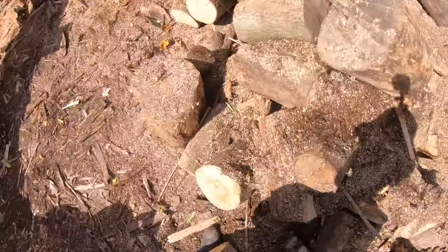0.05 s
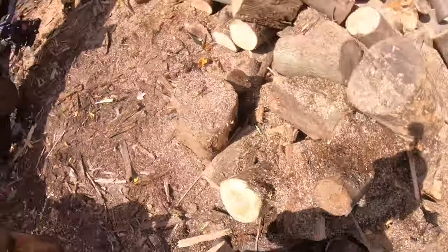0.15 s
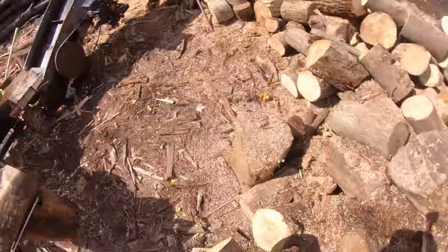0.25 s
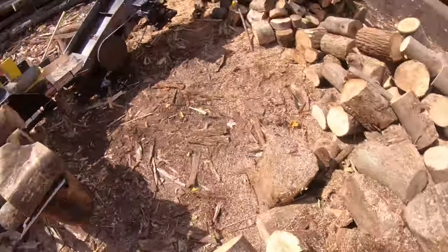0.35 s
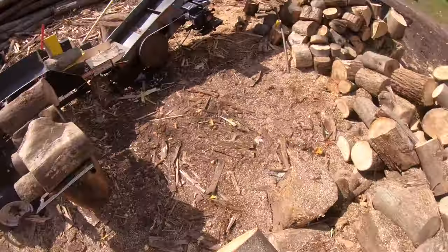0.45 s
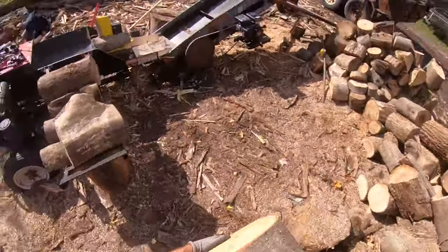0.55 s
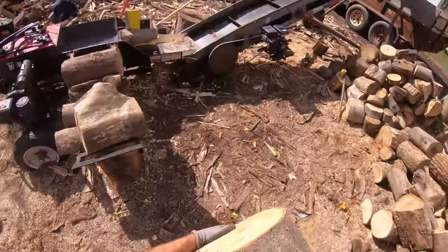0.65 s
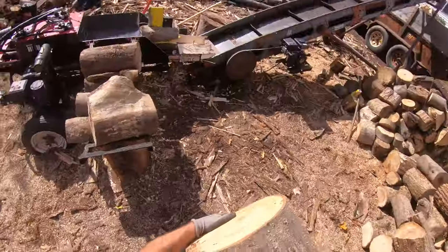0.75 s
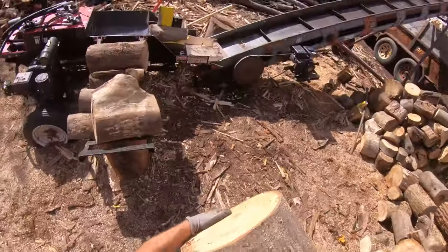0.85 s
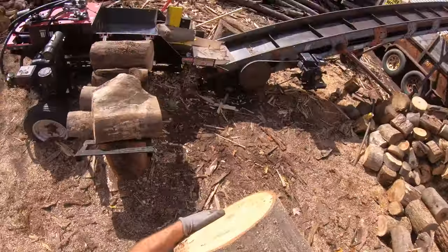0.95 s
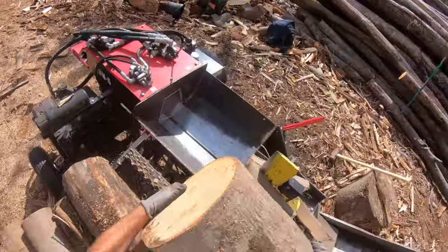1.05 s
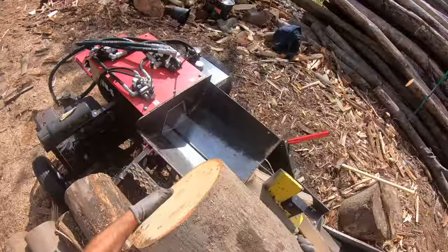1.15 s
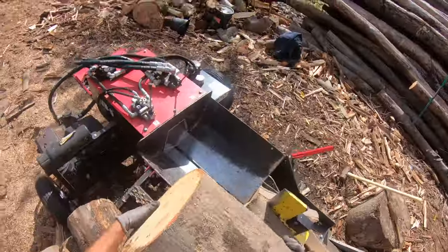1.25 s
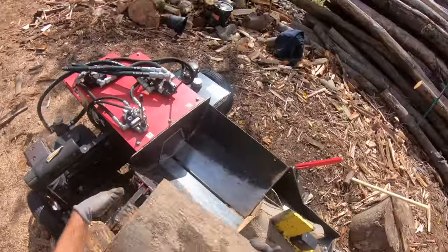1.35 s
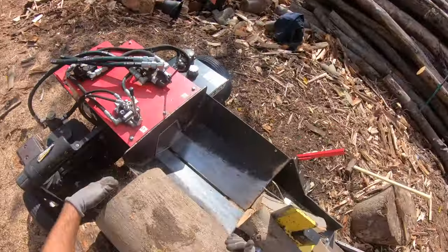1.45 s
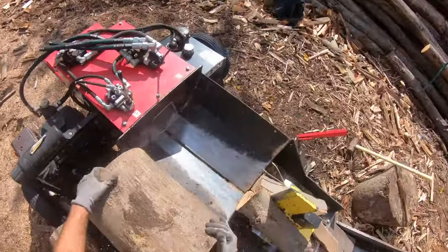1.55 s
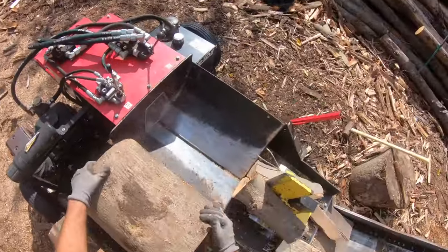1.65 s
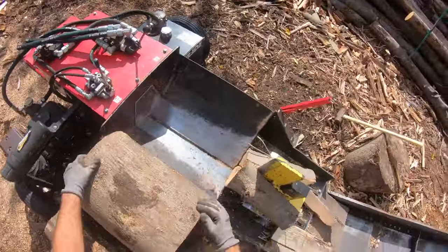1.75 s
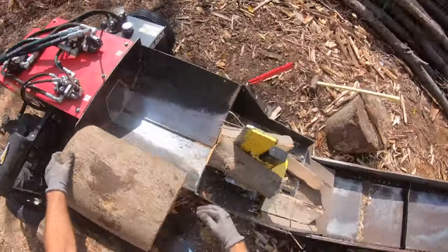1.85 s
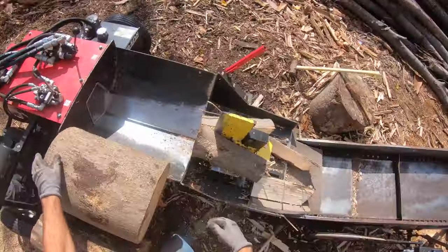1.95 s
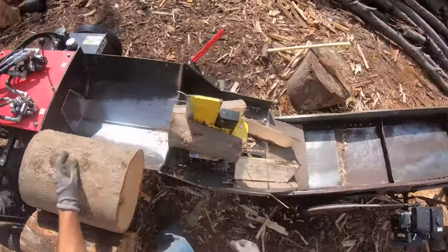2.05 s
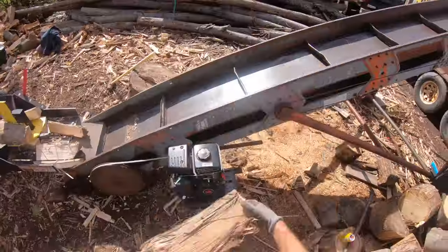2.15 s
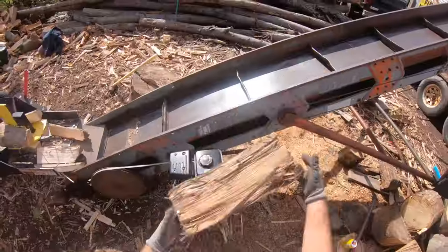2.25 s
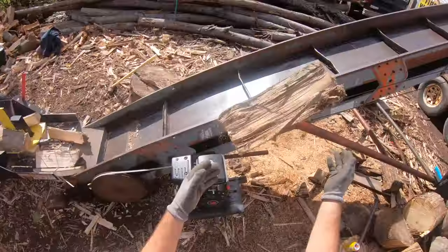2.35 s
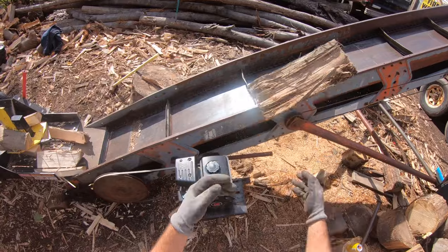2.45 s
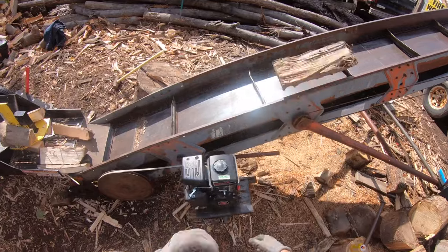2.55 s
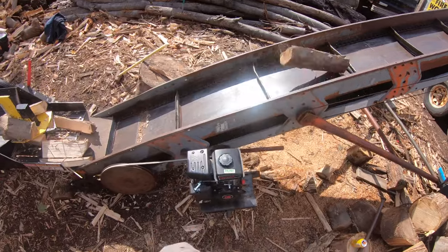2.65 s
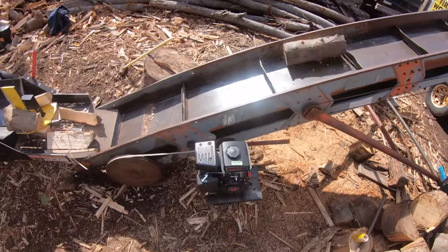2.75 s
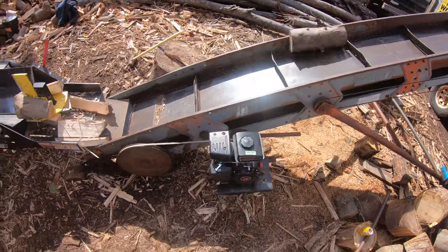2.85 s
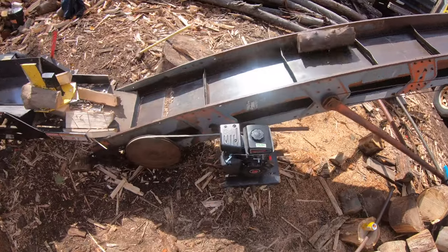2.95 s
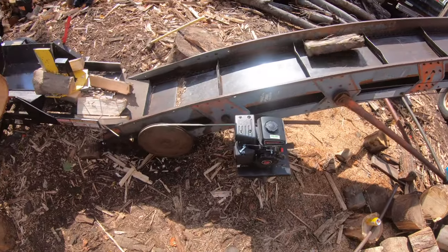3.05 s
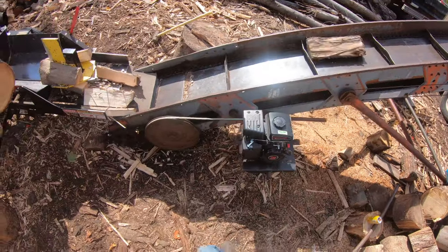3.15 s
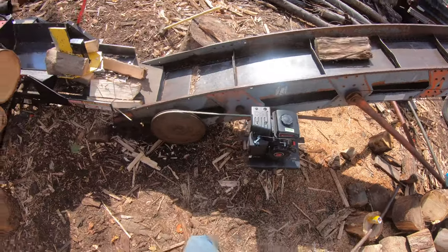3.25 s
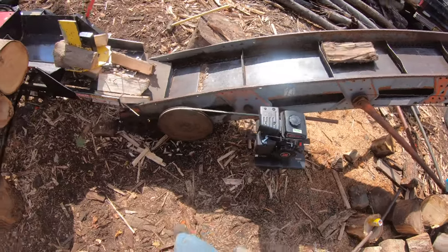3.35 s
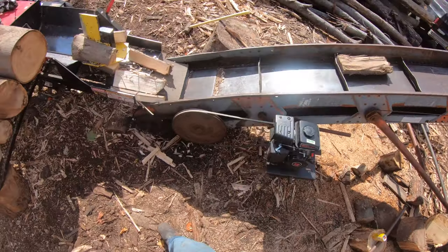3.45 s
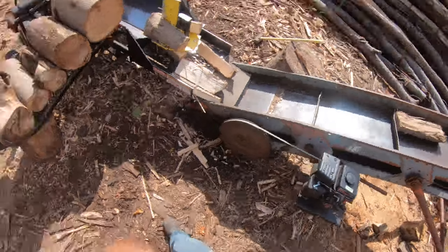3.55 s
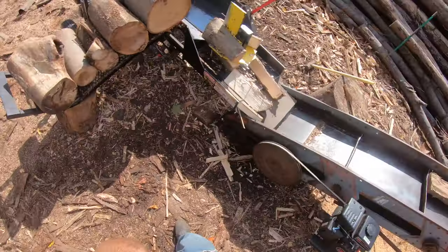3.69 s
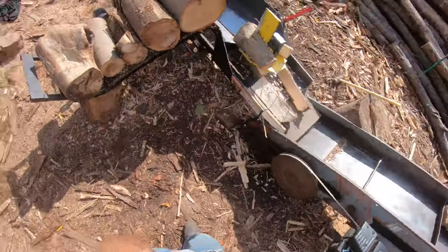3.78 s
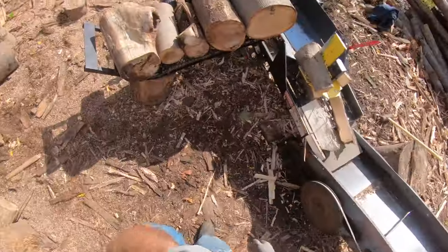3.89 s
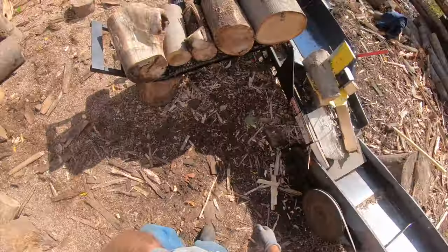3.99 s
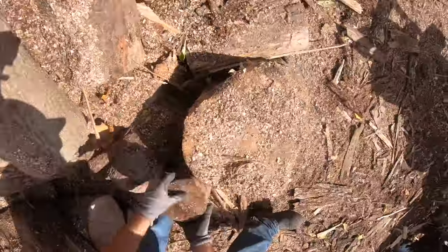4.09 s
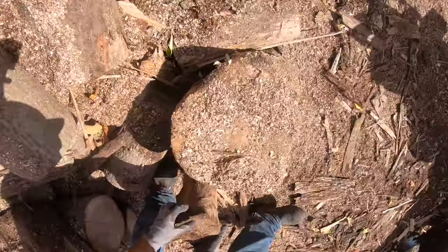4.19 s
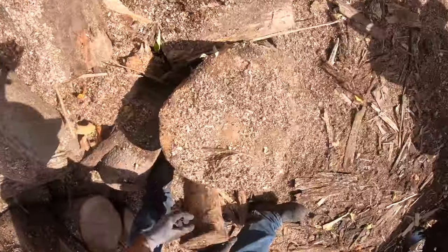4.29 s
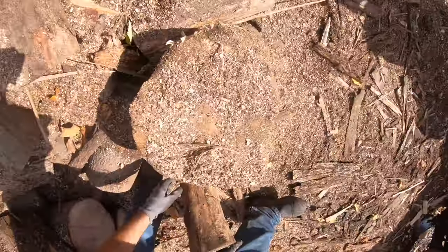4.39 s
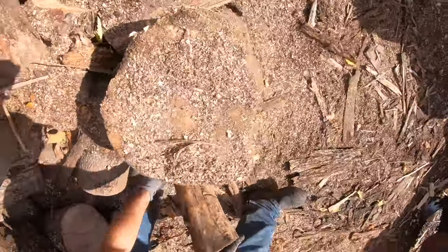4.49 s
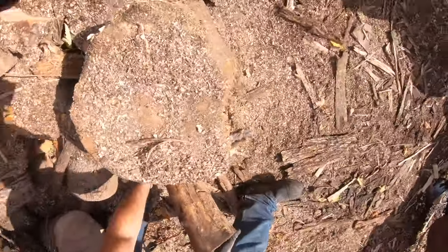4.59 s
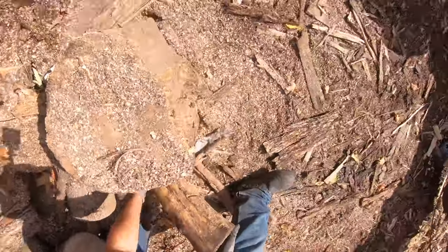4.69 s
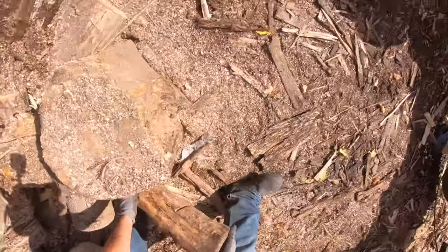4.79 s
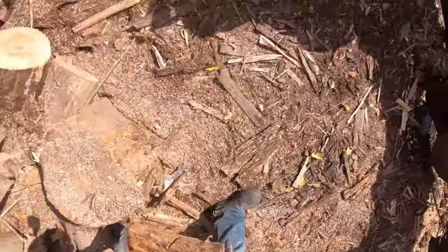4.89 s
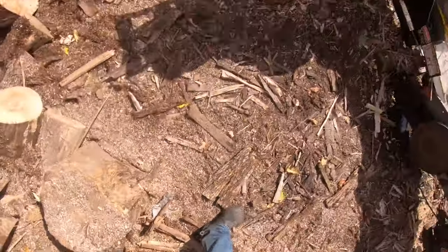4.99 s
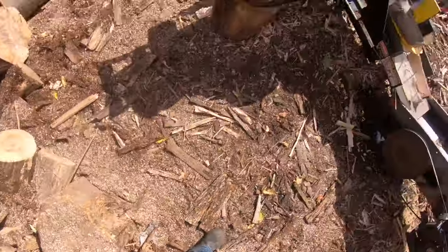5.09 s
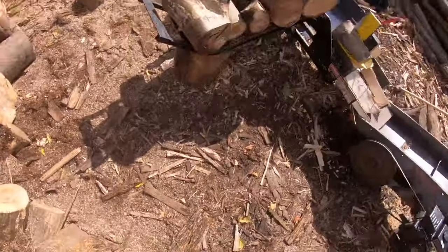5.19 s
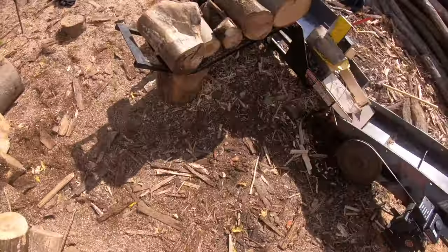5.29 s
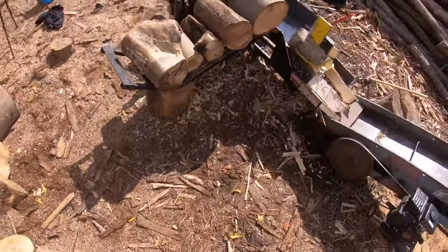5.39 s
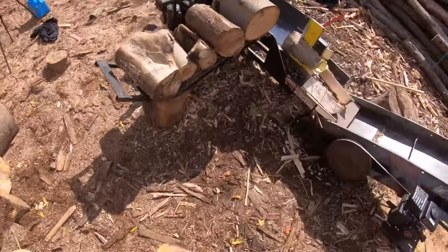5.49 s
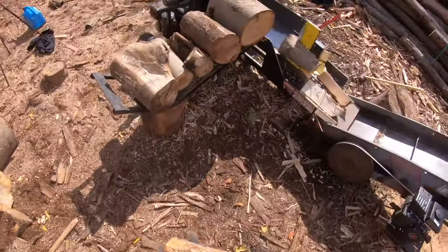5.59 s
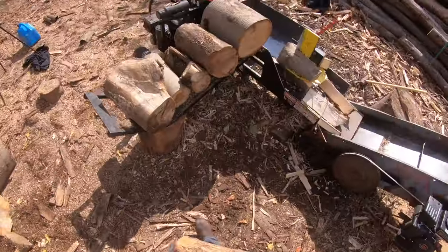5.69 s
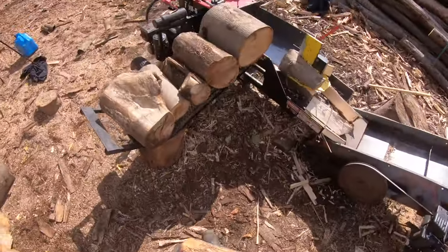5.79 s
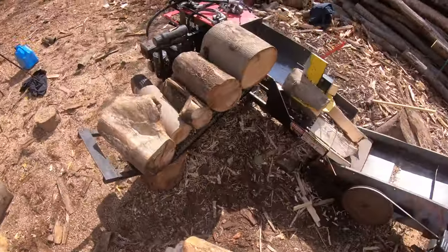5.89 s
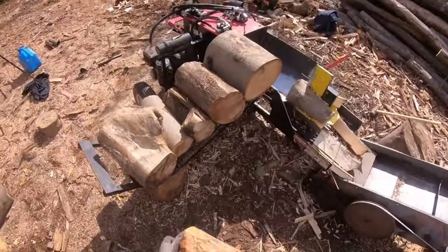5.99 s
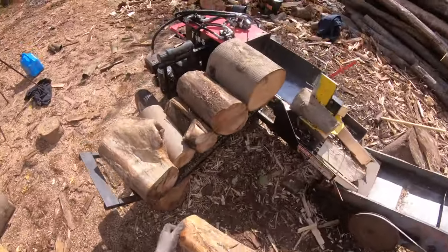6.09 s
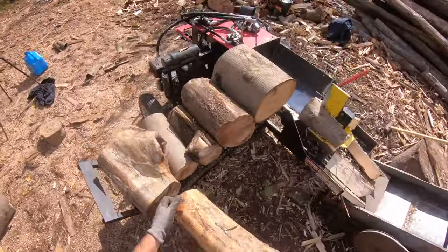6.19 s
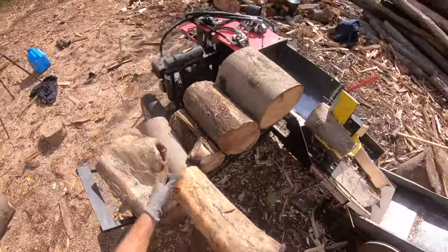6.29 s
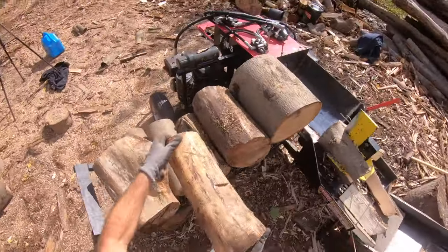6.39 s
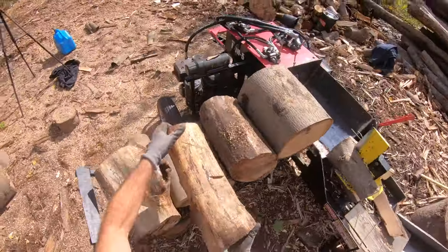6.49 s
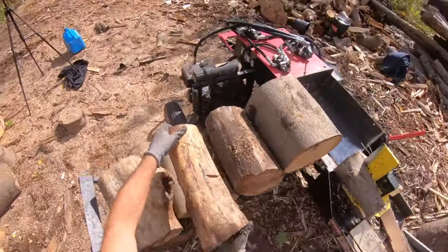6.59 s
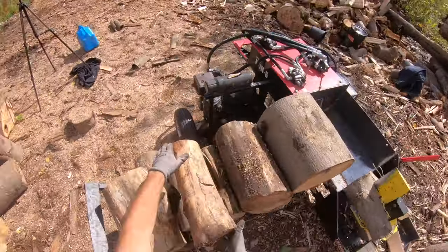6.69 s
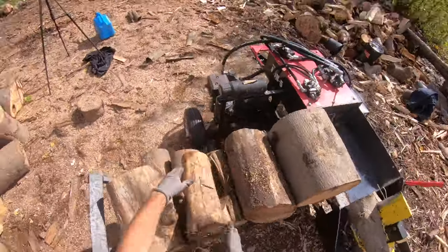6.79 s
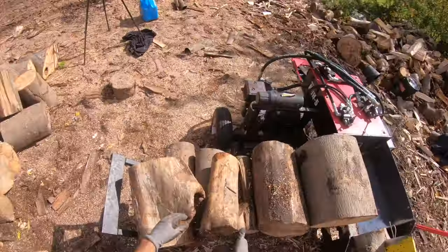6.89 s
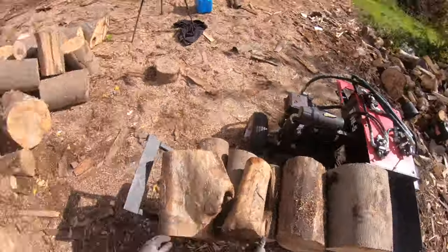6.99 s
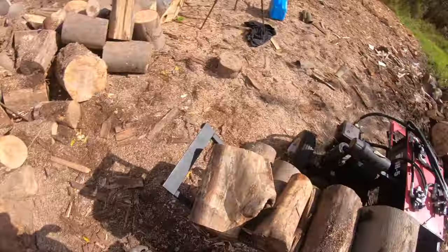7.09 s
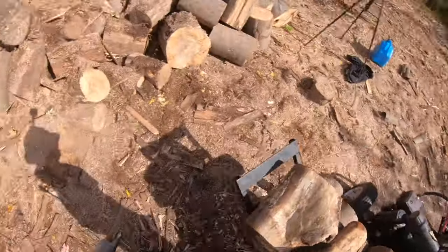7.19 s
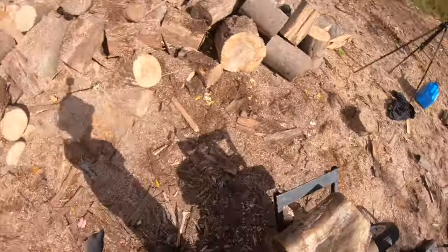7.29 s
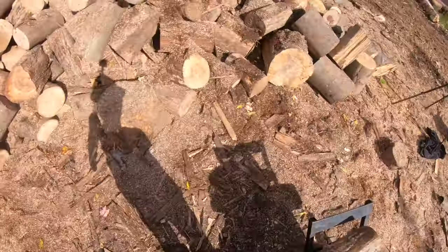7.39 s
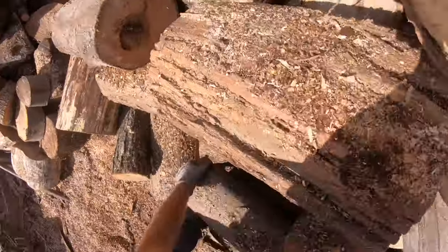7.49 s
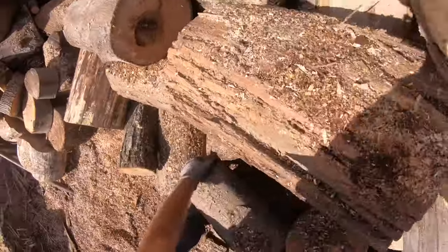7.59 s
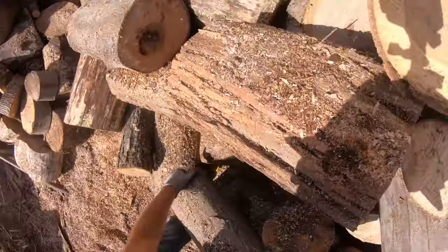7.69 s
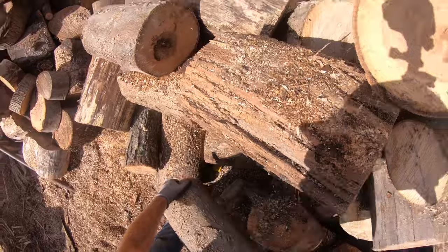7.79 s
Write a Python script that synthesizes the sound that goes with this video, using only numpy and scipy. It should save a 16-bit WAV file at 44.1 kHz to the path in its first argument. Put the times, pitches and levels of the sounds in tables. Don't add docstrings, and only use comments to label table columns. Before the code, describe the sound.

Outdoors, wind rumbles and flutters on a head-worn microphone. A firewood round drops hard on a steel rack, its loose chain clinking. A split log then crashes into a sheet-metal trough, booming and rattling to rest. Light wood taps and renewed gusts follow, then a round knocks its neighbours sharply. Wind rises again at the end over leafy hiss.

```python
import sys
import numpy as np
from scipy import signal
from scipy.fft import rfft, irfft, next_fast_len
from scipy.io import wavfile

SR = 44100
rng = np.random.default_rng(int(sys.argv[2]) if len(sys.argv) > 2 else 0)


def put_to_file(sound):
    columns = np.atleast_2d(sound).T
    safe = np.clip(columns, -1, 1)
    whole_steps = np.round(safe * 32767)
    wavfile.write(sys.argv[1], SR, whole_steps.astype(np.int16))


def invert_db(level):
    return 10 ** (np.asarray(level, dtype=float) / 20)


N = 345744
TIME_S = np.arange(N) / SR
SLOW_STEP = 40


def rms_one(x):
    return x / np.sqrt(np.mean(x ** 2) + 1e-20)


def in_time(rows, silent=None):
    s, *columns = np.transpose(rows)
    return [np.interp(TIME_S, s, c, silent, silent) for c in columns]


def held(rows):
    rows = np.array(rows)
    return rows[np.searchsorted(rows[1:, 0], TIME_S), 1:].T


def at_hz(points, hz):
    points = np.array(points)
    return np.interp(np.log(hz), np.log(points[:, 0]), points[:, 1])


def every_sample(slow):
    return np.interp(np.arange(N) / SLOW_STEP, np.arange(len(slow)), slow)


def drift(rate_hz):
    r = np.exp(-2 * np.pi * SLOW_STEP * rate_hz / SR)
    white = rng.standard_normal(N // SLOW_STEP + 2002)
    slow = signal.lfilter([1], [1, -2 * r, r * r], white)[2000:]
    return every_sample(rms_one(slow))


def bandpass(x, order, low_hz, high_hz):
    return signal.sosfilt(signal.butter(order, [low_hz, high_hz], "band", fs=SR, output="sos"), x)


def ring(x, hz, t60_s):
    r, w = invert_db(-60 / (t60_s * SR)), 2 * np.pi * hz / SR
    return signal.lfilter([0, np.sin(w)], [1, -2 * r * np.cos(w), r * r], x)


def bands(spectrum, likeness, shape, size=N):
    low_hz, high_hz = spectrum[0][0], spectrum[-1][0]
    edges_hz = np.geomspace(low_hz, high_hz, int(3 * np.log2(high_hz / low_hz)) + 2)
    out, power, white = 0, 0, rng.standard_normal((2, 2, size))
    for k, (low, high) in enumerate(zip(edges_hz, edges_hz[1:])):
        mid, side = bandpass(white[k % 2], 2, low, high)
        hz = np.sqrt(low * high)
        alike = np.clip(at_hz(likeness, hz), -1, 1)
        gain = invert_db(at_hz(spectrum, hz))
        pair = np.array([gain * np.sqrt(1 + alike) * mid, gain * np.sqrt(1 - alike) * side])
        out = out + shape(hz) * pair
        power += 2 * gain ** 2 * np.mean(mid ** 2)
    return np.array([out[0] + out[1], out[0] - out[1]]) / np.sqrt(power)


# offset in dB, slope in dB per dB of boom.
CLATTER_LAWS = [
    (-0.5, 1.5),
    (-20, 0.7),
    (-9, 1.17),
]


def with_clatter(shake, law):
    offset_db, slope = law
    return [(s, db, offset_db + slope * db) for s, db in shake]


# frequency in Hz, left-right likeness from -1 to 1.
STEEL_LIKENESS = [(60, 1), (100, 1), (180, 0.99), (310, 1), (550, 0.95), (950, 0.59), (1650, 0.44),
                  (2860, 0.96), (4970, 0.63), (8640, -0.3), (15000, -0.75)]
CONTACT_S = 0.0012
PING_HZ, PING_OCTAVES = 7000, 0.92


def steel(shakes, blows, colour, t60s, contacts_per_s, spread_db, shake_db, blow_db):
    contact_db = spread_db * np.minimum(rng.exponential(1, N), 4)
    hail = (rng.random(N) < contacts_per_s / SR) * invert_db(2 * contact_db)
    boom, clatter = (sum(invert_db(2 * in_time(shake, silent=-120)[column]) for shake in shakes)
                     for column in (0, 1))
    s, peak_db, soft_db, ping_db = np.transpose(blows)
    heard = slice(round(shakes[0][0][0] * SR), round(shakes[-1][-1][0] * SR))
    hail = hail[heard] / hail.mean()
    size = heard.stop - heard.start
    at = np.round(s * SR).astype(int) - heard.start
    inside = (at >= 0) & (at < len(hail))

    def stored(hz, soft):
        keep = invert_db(-120 / (at_hz(t60s, hz) * SR))
        ping = ping_db * np.exp(-(np.log2(hz / PING_HZ) / PING_OCTAVES) ** 2)
        spot_db = 3.0 * rng.standard_normal(len(s))
        hit_db = peak_db + blow_db + (soft_db if soft else ping) + spot_db
        hits = np.full(len(hail), 1e-18)
        hits[at[inside]] = invert_db(2 * hit_db)[inside]
        shaking = boom if soft else clatter
        steady = invert_db(2 * shake_db) * shaking[heard] * hail * (1 - keep)
        energy = signal.lfilter([1], [1, -keep], hits + steady)
        if not soft:
            energy = energy + invert_db(-12.0) * signal.lfilter([1], [1, -invert_db(-120 / (0.0053 * SR))], hits)
        slow = np.exp(-1 / (CONTACT_S * SR))
        loaded = signal.lfilter([(1 - slow) ** 2], [1, -2 * slow, slow ** 2], energy)
        return np.sqrt(np.abs(loaded))

    low = [p for p in colour if p[0] < 1000] + [(1000, at_hz(colour, 800))]
    high = [(1000, at_hz(colour, 1060))] + [p for p in colour if p[0] >= 1000]
    out = np.zeros((2, N))
    for soft, part in ((True, low), (False, high)):
        out[:, heard] += bands(part, STEEL_LIKENESS, lambda hz: stored(hz, soft), size=size)
    return out


# time in seconds, boom in dB.
TROUGH_SHAKE = [
    [(2.508, -14), (2.53, -9), (2.615, -10.5), (2.64, -8), (2.72, -10), (2.75, -7.5), (2.93, -13),
     (2.95, -13.5), (3.075, -23)],
    [(3.076, -21.5), (3.11, -17), (3.15, -12.5), (3.2, -18.5), (3.4, -28.5), (3.45, -31), (3.52, -31),
     (3.6, -40), (3.85, -53.5)],
]
# time in seconds, clatter peak in dB, boom above it in dB, ping above it in dB.
TROUGH_BLOWS = [(2.51, -17, 14, -2), (2.5212, -10, 1, 3), (2.55, -8, -2, -7), (2.625, -6.5, 8.5, -14),
                (2.634, -11.5, 2, 9.5), (2.641, -13.5, -6, 13.5), (2.654, -13, -3, 10.5),
                (2.664, -19, 2, 5), (2.688, -40.5, -12, -15), (2.727, -6, 5.5, 6.5), (2.734, -11, 0, -4),
                (2.766, -10.5, 7, 4), (2.8, -16, 8, 0), (2.824, -14.5, -10, 7), (2.833, -12, 2, 3),
                (2.863, -8.5, -4, -1.5), (2.905, -12, -7, -4), (2.925, -13, -10, 0), (2.98, -18.5, -9, 2),
                (3.004, -21, 0, 1), (3.0594, -25.5, 2, 8.5), (3.083, -22, -4, -10), (3.107, -11, 0.5, -1.5),
                (3.137, -13, -10, 0), (3.1516, -14.5, -41, 4), (3.163, -14.5, -5, 6.5),
                (3.175, -16, -12, 9), (3.213, -22, 10, 6), (3.269, -23, -7, -3), (3.29, -25, 4, 0),
                (3.31, -28.5, 8, 3), (3.372, -34, 0, 5), (3.409, -20.5, 6.5, -4), (3.423, -25, 1, 0),
                (3.433, -23, 2, 11), (3.442, -29, -3, 10), (3.4833, -28, 10, 9), (3.5335, -34.5, -2, 8.5),
                (3.591, -36, 10.5, 7), (3.607, -38, -6, 3.5)]
# frequency in Hz, density in dB per Hz.
TROUGH_COLOUR = [(29, -22), (50, -7.5), (119, -2), (183, 0.5), (302, -5), (423, -5), (1400, -23.5),
                 (2320, -21.5), (5130, -33), (7170, -30.5), (8200, -36), (15500, -64)]
# frequency in Hz, t60 in seconds.
TROUGH_T60 = [(60, 0.31), (250, 0.42), (1000, 0.28), (4000, 0.1), (12000, 0.031)]


def trough():
    shakes = [with_clatter(tumble, CLATTER_LAWS[-1]) for tumble in TROUGH_SHAKE]
    return steel(shakes, TROUGH_BLOWS, TROUGH_COLOUR, TROUGH_T60,
                 contacts_per_s=1200, spread_db=2.5, shake_db=-0.93, blow_db=-8.5)


# time in seconds, boom in dB.
RACK_SHAKE = [
    [(1.372, -15), (1.396, -13.5), (1.44, -10.5), (1.47, -13.5), (1.578, -19.5), (1.62, -28), (1.7, -38),
     (1.9, -49)],
    [(6.722, -24), (6.75, -15), (6.768, -26), (6.8, -28), (6.876, -40), (7.0, -60)],
]
# time in seconds, clatter peak in dB, boom above it in dB, ping above it in dB.
RACK_BLOWS = [(1.373, -19, 12, 9), (1.385, -11.5, 10.5, 8), (1.394, -11.5, 6, 13), (1.402, -12, -4, 8),
              (1.409, -11, 4, -8), (1.429, -7.5, 5, 8), (1.438, -10, -3, 0), (1.447, -11.5, 3, 6),
              (1.459, -22.5, 8, 6), (1.474, -16.5, 12, 2), (1.49, -25, 8, 2), (1.544, -15.5, 2.5, -18),
              (1.566, -20, -13, 0), (6.7235, -21, -27, 11), (6.747, -20, -22, 5), (6.772, -22.5, -19, -5)]
# frequency in Hz, density in dB per Hz.
RACK_COLOUR = [(29, -48), (50, -12), (110, -12.5), (201, -4), (413, -15.5), (488, -9), (564, -30),
               (717, -13.5), (911, -20.5), (2500, -29), (2680, -26), (2950, -27.5), (5640, -42),
               (9000, -51), (15500, -86)]
# frequency in Hz, t60 in seconds.
RACK_T60 = [(60, 0.48), (250, 0.38), (1000, 0.2), (4000, 0.072), (12000, 0.029)]


def rack():
    return sum(steel([with_clatter(shake, law)], RACK_BLOWS, RACK_COLOUR, RACK_T60,
                     contacts_per_s=740, spread_db=1.2, shake_db=-3.5, blow_db=-8.0)
               for shake, law in zip(RACK_SHAKE, CLATTER_LAWS))


def loose_metal(touches, modes, trim_db, chatter_s):
    touch = np.r_[np.hanning(7) / 3, np.zeros(SR // 6)]
    rings = [invert_db(db + trim_db) * ring(touch, hz, t60_s) for hz, db, t60_s in modes]
    luck = rng.standard_normal((len(touches), len(modes), 3)) * [2.5, 2, 1]
    out = np.zeros((2, N))
    for (s, peak_db, *_), strikes in zip(touches, luck):
        for mode_ring, (own_db, pan_db, late) in zip(rings, strikes):
            at = round((s + chatter_s * abs(late)) * SR)
            port_db = peak_db + own_db + pan_db * np.array([[1], [-1]])
            out[:, at:at + len(mode_ring)] += mode_ring * invert_db(port_db)
    return out


# time in seconds, peak in dB.
CHAIN = [(1.3872, -25), (1.4114, -4), (1.4464, -20), (1.4894, -21), (1.568, -10.5), (1.6825, -18.5),
         (1.6994, -28), (1.716, -36), (1.7953, -50), (1.8225, -25.5), (1.8637, -34), (1.8836, -44),
         (6.9311, -26.5), (6.9444, -33)]
# frequency in Hz, level in dB, t60 in seconds.
CHAIN_MODES = [(626, -4, 0.22), (726, -12.5, 0.26), (1260, -17, 0.16), (1828, -11.5, 0.12),
               (2320, -13, 0.11), (2410, -17, 0.051), (2563, -4.5, 0.08), (2820, 2, 0.027),
               (3020, -5, 0.048), (3250, -12.5, 0.12), (3670, -14, 0.07), (3800, -14, 0.16),
               (4540, -17, 0.065)]


def chain():
    return sum(loose_metal(CHAIN, CHAIN_MODES, -12.5, chatter_s) for chatter_s in (.002, .012))


# frequency in Hz, level in dB, t60 in seconds.
TROUGH_MODES = [(1650, -4, .08), (2320, -5, .08), (3120, -8, .06), (3470, -9, .06), (4810, -11, .08),
                (5740, -11, .08), (6710, -10, .06), (7430, -10, .08)]


def cross_bars():
    return loose_metal(TROUGH_BLOWS, TROUGH_MODES, -15, .003)


# frequency in Hz, t60 in seconds.
WOOD_MODES = [(560, 0.11), (800, 0.032), (1150, 0.036), (1400, 0.026), (1750, 0.023), (2250, 0.017),
              (2800, 0.016), (3500, 0.016), (4600, 0.015)]
# time in seconds, peak in dB,
# centre in Hz.
TICKS = [(0.828, -46, 930), (1.3735, -31, 930), (1.386, -24, 1550), (1.795, -40, 2400), (1.864, -31, 2400),
         (1.884, -37, 2200), (2.5103, -15, 600), (2.628, -6, 890), (2.689, -23, 1100), (2.707, -28, 900),
         (2.728, 3, 2940), (3.135, -18, 900), (4.194, -25.5, 2400), (4.196, -28, 1250), (4.566, -19, 1250),
         (4.5642, -20, 2210), (5.023, -22.5, 1730), (5.031, -29, 3200), (6.064, -27.5, 800),
         (6.186, -21, 676), (6.187, -32.5, 1300), (6.312, -26, 750), (6.432, -36.5, 1200),
         (6.7353, -12.5, 2200), (6.755, -25, 800), (6.7245, -12, 3500), (6.7253, -12, 4700),
         (6.7255, -16, 1700), (6.736, -9, 1400), (6.752, -20, 3200), (1.389, -5, 4600), (1.406, -9, 4600),
         (1.432, -9, 2200), (2.64, -4, 1800), (2.734, -4.5, 2300), (2.826, -11, 1500), (2.838, -11, 2600),
         (3.109, -17, 2310), (3.416, -22, 1900), (3.441, -22, 2930), (3.484, -32, 2500)]
# time in seconds, peak in dB, pitch in Hz, length in cycles.
THUMPS = [(0.639, -27, 147, 16), (0.659, -25, 388, 17), (0.827, -23.5, 252, 15), (1.3726, -6, 220, 2.6),
          (1.388, -10.5, 1480, 25), (1.47, -18, 200, 17), (1.49, -12, 710, 30), (1.3881, -8.5, 231, 26),
          (1.429, -7, 208, 9.8), (2.5102, -2, 432, 3), (2.513, 4, 194, 5.1), (2.627, -4, 189, 0.93),
          (2.688, -10, 328, 2.2), (2.709, -4, 196, 2.9), (2.7288, -3, 400, 2), (2.76, -9, 151, 6.1),
          (3.086, -11.5, 181, 2.5), (3.135, -6, 333, 1.6), (4.195, -20.5, 335, 5.8),
          (4.567, -18.5, 300, 6.3), (5.024, -43, 1640, 30), (5.024, -39, 1100, 24), (5.046, -36, 1670, 52),
          (5.074, -43, 1600, 30), (5.022, -31.5, 292, 12), (5.044, -29, 300, 4.5), (6.065, -34, 620, 6.1),
          (6.186, -25, 400, 11), (6.312, -30, 560, 2.3), (6.727, -19, 300, 1.4), (6.732, 3, 300, 2.8),
          (6.736, -16, 171, 4.7), (6.755, 3.5, 335, 2.25), (6.758, -7, 184, 4.1), (6.767, -19, 250, 2.4),
          (6.785, -23, 329, 130), (1.399, -5, 200, 7.2), (1.434, -9, 192, 5), (1.459, -12, 170, 2.9),
          (1.41, -13, 2680, 40), (1.491, -18, 2700, 30), (1.57, -17, 2870, 60), (1.582, -20, 2720, 40),
          (2.527, -7, 165, 2.4), (2.795, -8, 210, 2.2), (2.86, -12, 230, 2.7), (2.913, -9.5, 200, 4),
          (6.184, -28, 210, 6), (1.45, -14, 149, 21)]


def knocks(tick_trim_db, fall_db):
    out = np.zeros(N)
    luck_db = rng.standard_normal((len(TICKS), len(WOOD_MODES)))
    soft_touch = np.r_[np.hanning(9), np.zeros(SR // 8)] / 4
    for (s, tick_db, tick_hz), own_dbs in zip(TICKS, luck_db):
        tick = 0
        for k, ((mode_hz, t60_s), own_db) in enumerate(zip(WOOD_MODES, own_dbs)):
            mode_db = own_db - fall_db * np.log2(mode_hz / tick_hz) ** 2
            tick = tick + invert_db(mode_db) * (-1) ** k * ring(soft_touch, mode_hz, t60_s)
        out[round(s * SR):][:len(tick)] += invert_db(tick_db + tick_trim_db) * tick
    for s, thump_db, hz, cycles in THUMPS:
        t60_s = cycles / hz
        thump = ring(ring(soft_touch, hz, t60_s), 1.093 * hz, t60_s)
        thump = signal.lfilter(*signal.butter(2, 0.28 * hz, "high", fs=SR), thump)
        out[round(s * SR):][:len(thump)] += invert_db(thump_db) * thump / np.abs(thump).max()
    return out * invert_db([[-.6], [.6]])


FALL_DB, RISE_SHARE = 12, .55


def swells(rows):
    t = np.arange(0, N + SLOW_STEP, SLOW_STEP) / SR
    out = []
    for s, fall_s, db, *_ in rows:
        falls = np.maximum(t - s, (s - t) / RISE_SHARE) / max(fall_s, .01)
        out.append(invert_db(2 * (db - FALL_DB * falls)))
    return np.array(out)


# start in seconds, length in seconds, level in dB, first and last pitch in Hz.
VORTICES = [(0, 0.038, -16, 79, 109), (.032, 0.026, -12.5, 75.5, 121), (.09, 0.077, -14.5, 84.8, 145.2),
            (.18, .018, -13, 120, 110), (.19, 0.032, -21.5, 291, 374), (.2, 0.031, -16.5, 85, 85),
            (0.251, .035, -25, 100, 80), (.36, 0.035, -32, 181, 220), (4.675, 0.033, -12.5, 59.7, 59.7),
            (4.715, 0.054, -11, 73.4, 140), (4.75, 0.016, -17.5, 243, 262), (4.8, 0.03, -18.5, 190, 130),
            (4.895, 0.0283, -21, 101, 183), (4.935, 0.052, -19.5, 91, 50), (5.369, 0.03, -28.5, 70, 85),
            (5.728, .04, -22, 45, 80), (5.864, 0.043, -21.5, 55, 75), (6.3, 0.087, -23.5, 45.2, 40.2),
            (7.65, 0.019, -14.5, 187, 158), (7.675, 0.02, -17, 70.5, 60), (7.73, 0.025, -16, 171, 180),
            (7.755, 0.034, -14.5, 114, 94)]


def vortices(port_turns):
    out = np.zeros((2, N))
    for (s, length_s, db, first_hz, last_hz), turn in zip(VORTICES, rng.random(len(VORTICES))):
        size = round(1.21 * length_s * SR)
        glide = np.cumsum(np.linspace(first_hz, last_hz, size)) / SR
        hum = np.sin(2 * np.pi * (turn + np.array([[0], [port_turns]]) + glide))
        out[:, round(s * SR):][:, :size] += invert_db(db) * np.sqrt(np.hanning(size)) * hum
    return out


# peak in seconds, time to fall 12 dB in seconds, buffet in dB, left-right in dB.
GUSTS = [(0.035, 0.1, -15, 3), (0.14, 0.05, -19, 7), (0.22, -0.05, -25.5, 3.5), (.4, 0.2, -32.5, 5),
         (.786, 0, -38, -3), (.872, 0.05, -33.5, 3), (.96, 0.05, -25, 4), (1.31, 0.67, -35, -2),
         (1.966, 0, -41.5, -19), (2.042, 0.1, -43, -14), (2.196, 0.18, -30, 12), (2.318, -0.6, -36, 3),
         (2.48, 0.4, -42, -14), (3.8, 1.5, -43, -6), (4.03, -2, -49, -2), (4.25, 0.27, -28, -0.5),
         (4.48, 0, -27, -2), (4.66, -0.02, -18.5, 0), (4.74, 0, -17, 10.5), (4.83, 0.31, -22, 9),
         (5.0, 0.25, -32.5, -14), (5.39, -0.02, -33, -11), (5.59, 0.1, -27, -3), (5.77, 0.14, -27, -4),
         (5.87, 0.18, -28.5, -3), (6.04, 0.14, -33.5, -7), (6.33, 0.3, -34, -5), (7.154, -0.4, -36, 9),
         (7.276, -0.5, -38, 4), (7.505, -0.3, -32, 3), (7.575, 0.13, -24, -3), (7.69, -0.05, -22, 3),
         (7.804, 0.17, -19.5, 1)]
# peak in seconds, time to fall 12 dB in seconds, flutter in dB.
FLUTTERS = [(0.0, 0.15, -22), (.14, .07, -23), (.17, .05, -22), (.235, 0.1, -23.5), (.39, -0.24, -28),
            (.64, -2.5, -49), (.84, 0.15, -34.5), (1.34, -4, -51), (1.85, 0.26, -42), (2.0, -0.6, -49),
            (2.2, 0.5, -52), (3.7, 0.5, -59), (4.2, -1.3, -46), (4.76, 0.09, -19), (4.84, 0.01, -29),
            (4.92, 0, -24), (4.99, -0.05, -26), (5.02, 0, -26), (5.58, 0.03, -41), (5.76, .06, -34.5),
            (5.9, 0.12, -31), (6.05, 0.2, -42), (6.18, 0.02, -36.5), (7.505, 0.13, -35), (7.58, 0.1, -32),
            (7.68, 0.03, -21), (7.715, -0.04, -24.5), (7.78, -0.04, -24)]
# peak in seconds, time to fall 12 dB in seconds, snap in dB.
SNAPS = [(.06, -0.04, -35), (.21, -0.12, -19), (.245, -0.21, -21.5), (.275, -0.21, -29), (.35, -0.35, -31),
         (.41, -0.4, -42), (4.745, 0, -38), (4.768, 0.1, -24.5), (4.79, 0.04, -34), (4.812, 0.12, -36),
         (4.845, -0.1, -41), (4.92, 0, -33.5), (5.89, 0, -47), (7.52, .03, -40), (7.675, 0.16, -31),
         (7.745, 0.1, -27.5)]
BREEZE_DB, BREEZE_FLUTTER_DB, BREEZE_PAN_DB = -50, -60.5, -2.5


def wind(lumpy_db, top_hz, flutter_hz, snap_hz):
    gusts, calm = swells(GUSTS), invert_db(2 * BREEZE_DB)
    gust_power = gusts.sum(axis=0)
    pan_db = (np.array(GUSTS)[:, 3] @ gusts + BREEZE_PAN_DB * calm) / (gust_power + calm)
    pan_db = every_sample(pan_db)
    ducked = invert_db(2 * ducking_db())
    strong = np.sqrt(every_sample(gust_power) + calm * ducked)
    fast = np.sqrt(every_sample(swells(FLUTTERS).sum(axis=0)) + invert_db(2 * BREEZE_FLUTTER_DB) * ducked)
    snapping = np.sqrt(every_sample(swells(SNAPS).sum(axis=0)))
    out = []
    for side, street in zip((1, -1), vortices(0.23)):
        white = rng.standard_normal((2, N))
        lumps = invert_db(lumpy_db * drift(13.0))
        buffet = strong * rms_one(bandpass(white[0], 2, 29, top_hz) * lumps)
        flutter = fast * rms_one(bandpass(white[1], 3, 95, flutter_hz) * lumps)
        snap = snapping * rms_one(bandpass(white[0], 3, 200, snap_hz))
        out.append(invert_db(side * pan_db / 2) * (buffet + flutter + snap + street))
    return np.array(out)


# frequency in Hz, density in dB per Hz.
AIR_BODY = [(110, -25), (150, -3.5), (240, -8.5), (540, -8.5), (1000, -8), (1500, -7.5), (2140, -9.5),
            (3270, -9.5), (4700, -15.5), (5600, -68), (7000, -53)]
# frequency in Hz, density in dB per Hz.
AIR_TREBLE = [(2650, -1.5), (4500, 2), (7240, 0), (7860, -12), (9270, -9), (10500, -20), (11800, -47),
              (14300, -51), (15500, -48)]
# frequency in Hz, left-right likeness.
AIR_LIKENESS = [(60, 0.42), (120, 1), (240, 1), (480, 0.83), (950, 0.022), (1890, 0.38), (3770, 0.23),
                (7520, 0.01), (15000, 0.08)]
CUTS_S = [1.01, 2.185, 4.115, 7.49]
TURN_S = 7.17
# start in seconds, leaves and far traffic in dB,
# treble above it in dB, tilt in dB per octave, treble tilt in dB per octave, share of the side signal kept.
HEADINGS = [(0, -47, -6.5, -4, 4, 5), (-0.45, -43.5, -7.5, -2.5, -0.5, 1), (CUTS_S[0],
            -42, -9.5, -2.3, 0.1, 0.56), (CUTS_S[1], -45.5, -3.5, -1.87, 0.1, 0.97), (CUTS_S[2],
            -47, -3.5, -1, -0.6, 1), (5, -46, -4.5, -2.5, 0, 2.5), (TURN_S, -44.5, -1.9, -1.4, 2.5, 1),
            (6.5, -46, 2.5, -0.8, 4, 5), (CUTS_S[3], -39, -15, 0.62, 18, 0.0042)]


def air(patchy_db, treble_trim_db):
    level_db, treble_db, *_ = held(HEADINGS)
    closed = guard()
    level_db = level_db + GUARD_MAKEUP_DB * closed + ducking_db()
    treble_db = treble_db + GUARD_TREBLE_DB * closed + patchy_db * drift(3.4)
    patches = [invert_db(patchy_db * drift(3.7)) for _ in range(3)]
    starts_s, *_, tilt_db, top_tilt_db, _ = np.transpose(HEADINGS)
    heading = np.searchsorted(starts_s[1:], TIME_S)

    def body_shape(hz):
        return patches[int(hz) % 3] * invert_db(tilt_db * np.log2(hz / 1800))[heading]

    def treble_shape(hz):
        return invert_db(top_tilt_db * np.log2(hz / 7000))[heading]

    body = bands(AIR_BODY, AIR_LIKENESS, body_shape)
    treble = bands(AIR_TREBLE, AIR_LIKENESS, treble_shape)
    return invert_db(level_db) * (invert_db(3.0) * body + invert_db(treble_db + treble_trim_db) * treble)


# time in seconds, level in dB.
DRONE = [(0, -50), (.3, -47), (.6, -43.5), (1.0, -42.5), (1.05, -53), (1.3, -50)]


def drone(low_hz, high_hz):
    band = bandpass(rng.standard_normal(N), 2, low_hz, high_hz)
    return invert_db(in_time(DRONE, silent=-120)[0]) * rms_one(band)


GUARD_FROM_S, GUARD_UNTIL_S, GUARD_CLOSING_S = 0.27, CUTS_S[0], 0.22
GUARD_TREBLE_DB, GUARD_MAKEUP_DB = -11.5, 3.5


def guard():
    late = np.clip(TIME_S - GUARD_FROM_S, 0, None) / GUARD_CLOSING_S
    return (1 - (1 + late) * np.exp(-late * 2)) * (TIME_S < GUARD_UNTIL_S)


# drop in seconds, release in seconds, depth in dB, reset in seconds.
DUCKS = [
    (1.383, 1.86, -7.5, CUTS_S[1]),
    (2.527, 3.69, -8.5, CUTS_S[2]),
    (6.726, 6.85, -3.5, CUTS_S[3]),
]
RECOVERY_DB_PER_S = 9


def ducking_db():
    out = 0
    for drop_s, release_s, depth_db, reset_s in DUCKS:
        gain_db = depth_db + RECOVERY_DB_PER_S * np.clip(TIME_S - release_s, 0, None)
        out = out + np.minimum(gain_db, 0) * (TIME_S > drop_s) * (TIME_S < reset_s)
    return out


def scene():
    metal = trough() + rack() + chain() + cross_bars()
    wood = knocks(tick_trim_db=-7.5, fall_db=23.0)
    gusty = wind(lumpy_db=0.77, top_hz=82.5, flutter_hz=221, snap_hz=373)
    background = air(patchy_db=0.96, treble_trim_db=1.42) + drone(570, 880)
    return metal + wood + gusty + background


def low_pass(x):
    return signal.sosfilt(signal.butter(12, 15610, fs=SR, output="sos"), x)


BASS_DELAY_HZ, ALLPASS_STAGES = 300, 8
DIP_S, DIP_WIDTH_S = 6.424, .006


def record(dry):
    size = next_fast_len(N + SR // 4)
    hz = np.arange(size // 2 + 1) * SR / size
    late_bass = ((1j * hz - BASS_DELAY_HZ) / (1j * hz + BASS_DELAY_HZ)) ** ALLPASS_STAGES
    null = 1 - 0.43 * np.exp(-((hz - 4200) / 600) ** 2)
    spectra = rfft([dry[0] + dry[1], dry[0] - dry[1]], size)
    mid, side = irfft(spectra * late_bass * [np.ones_like(null), null], size)[:, :N] / 2
    side = side * np.clip(held(HEADINGS)[-1], 0, 1) * (1 - guard())
    dip = 1 - 0.88 * np.exp(-((TIME_S - DIP_S) / DIP_WIDTH_S) ** 2)
    x = dip * np.array([mid + side, mid - side])
    mix = np.clip(1.645 * np.tanh(x / 1.605), -1, 1)
    return low_pass(mix)


dry = scene()
out = record(dry)
put_to_file(out)
```